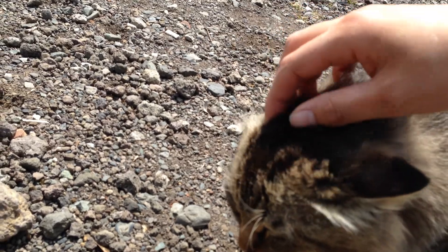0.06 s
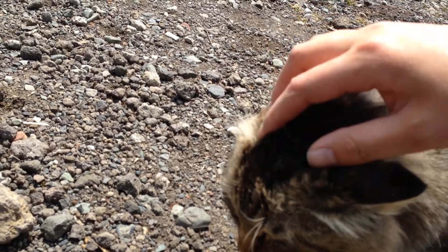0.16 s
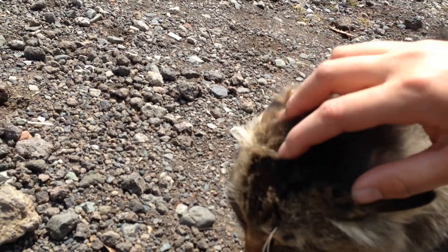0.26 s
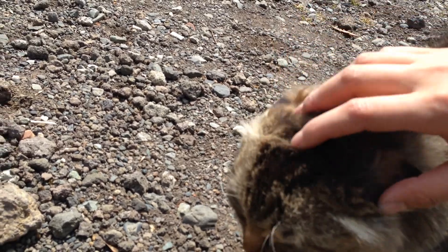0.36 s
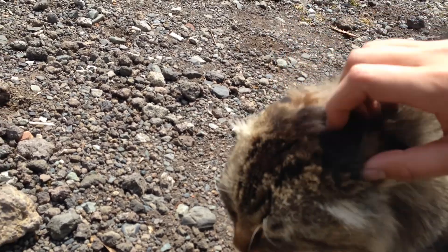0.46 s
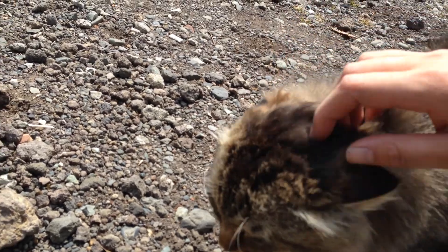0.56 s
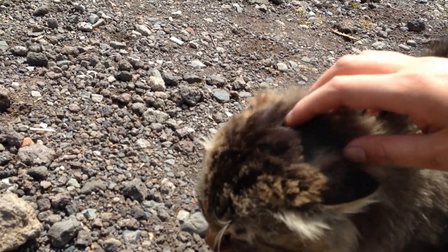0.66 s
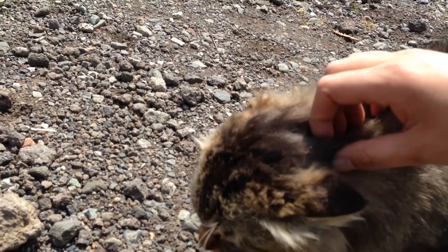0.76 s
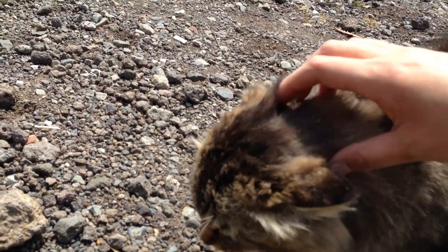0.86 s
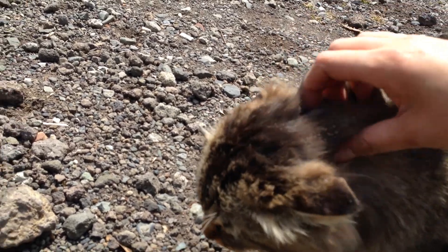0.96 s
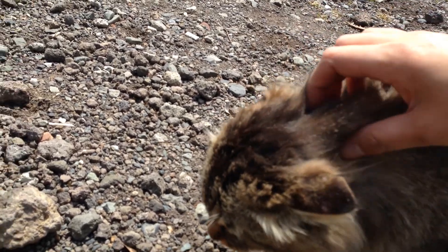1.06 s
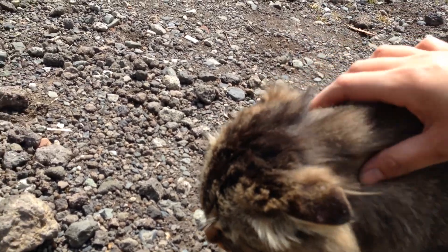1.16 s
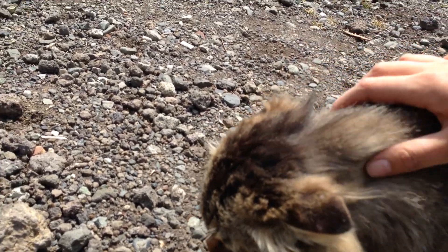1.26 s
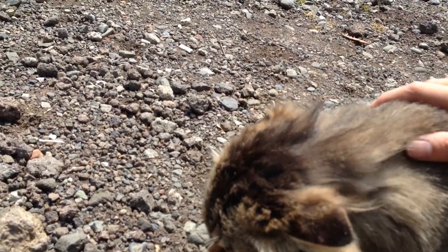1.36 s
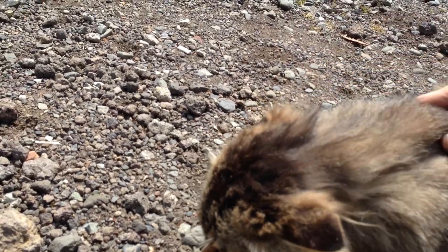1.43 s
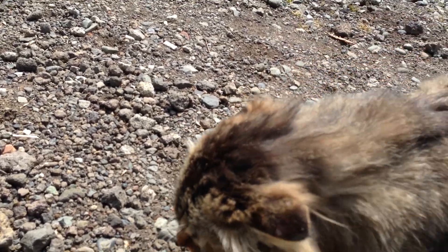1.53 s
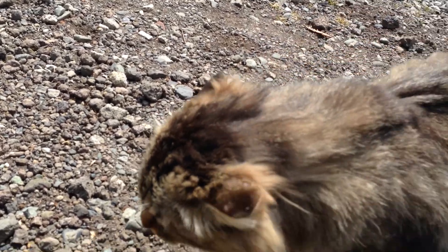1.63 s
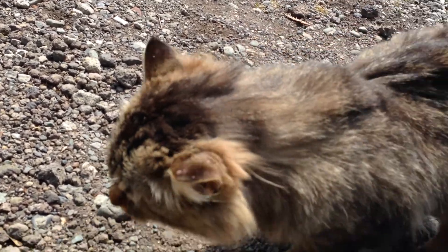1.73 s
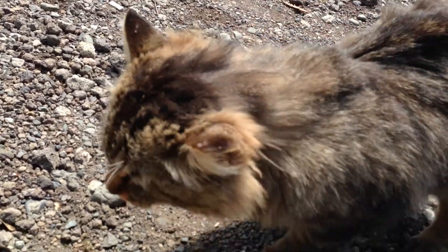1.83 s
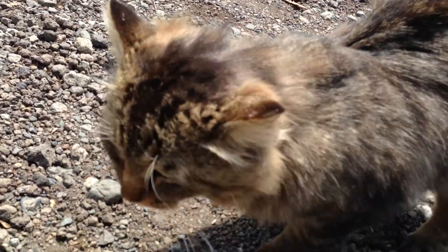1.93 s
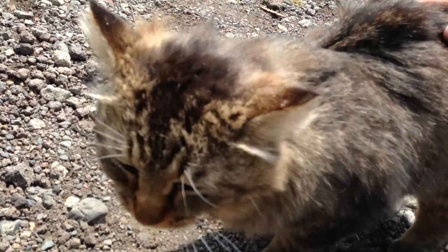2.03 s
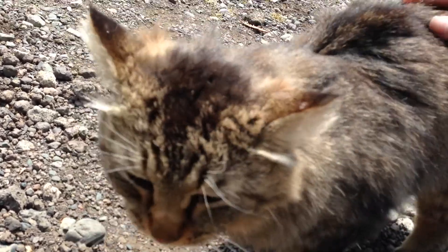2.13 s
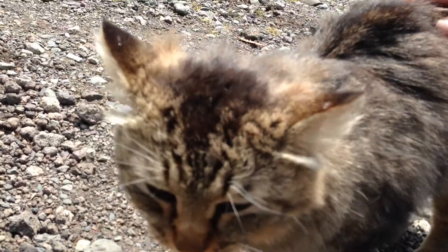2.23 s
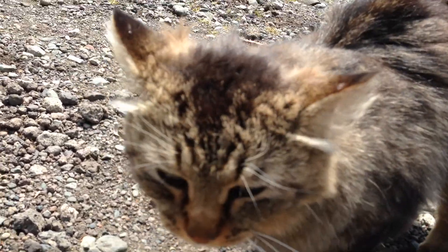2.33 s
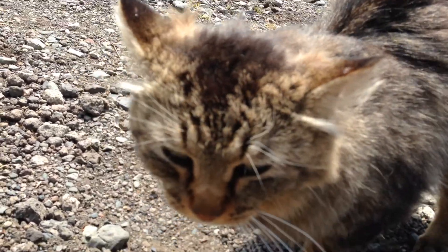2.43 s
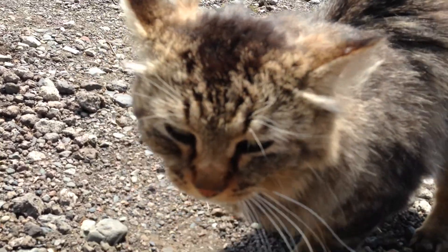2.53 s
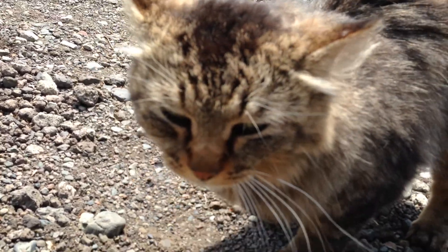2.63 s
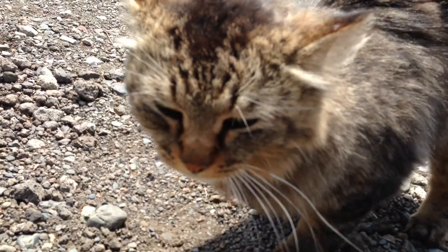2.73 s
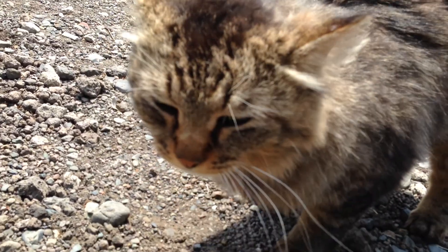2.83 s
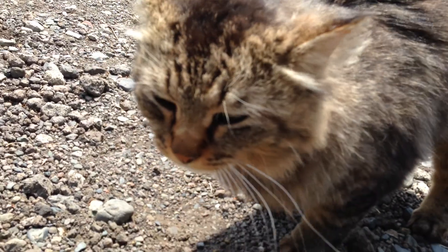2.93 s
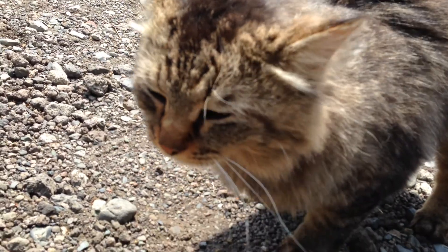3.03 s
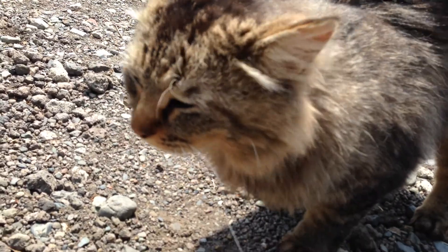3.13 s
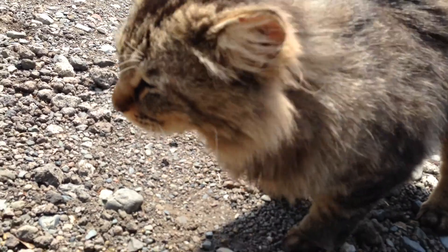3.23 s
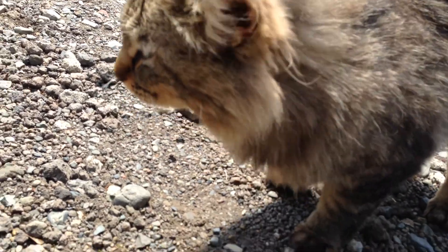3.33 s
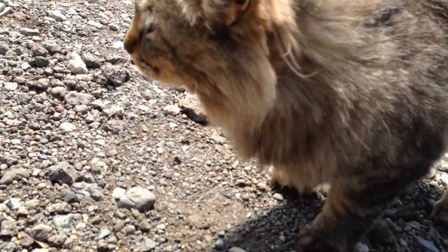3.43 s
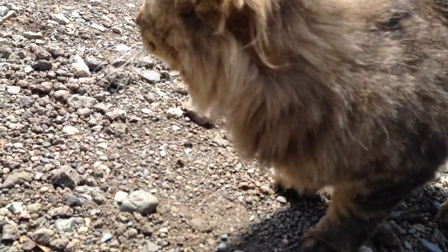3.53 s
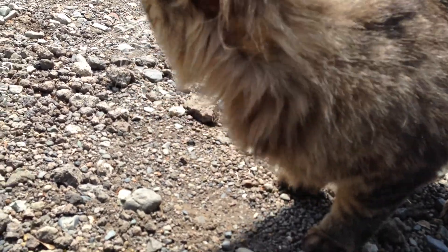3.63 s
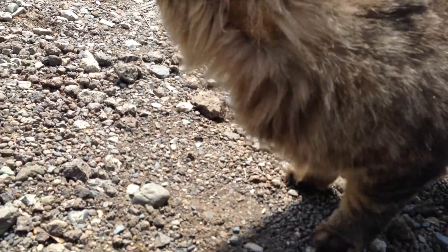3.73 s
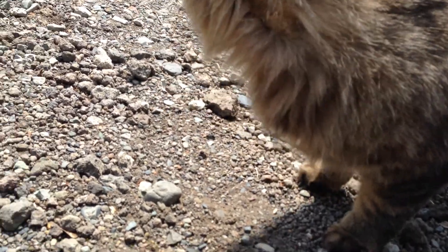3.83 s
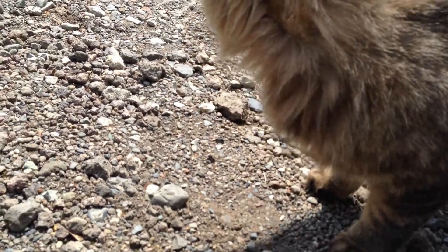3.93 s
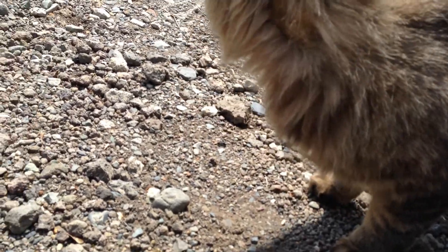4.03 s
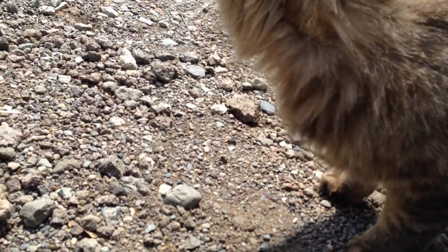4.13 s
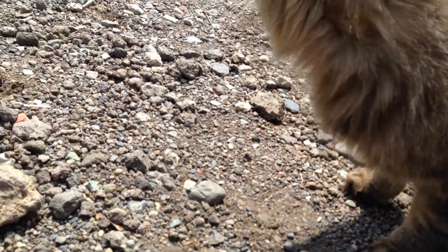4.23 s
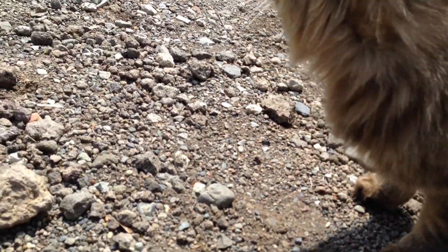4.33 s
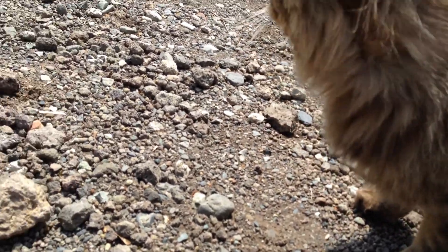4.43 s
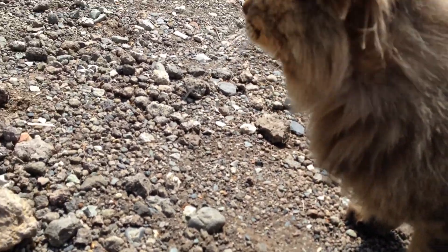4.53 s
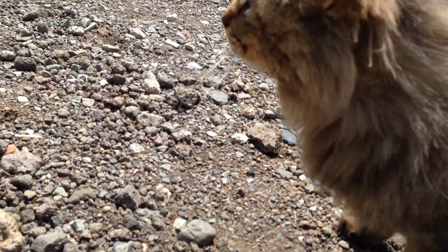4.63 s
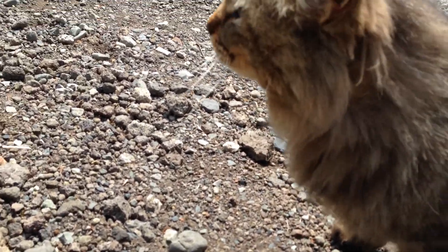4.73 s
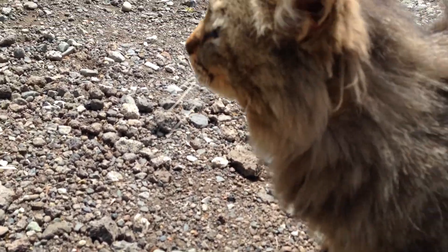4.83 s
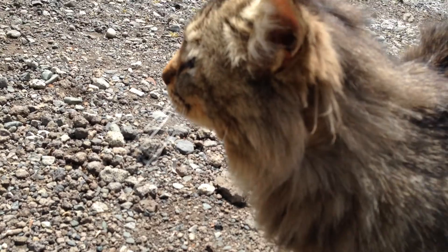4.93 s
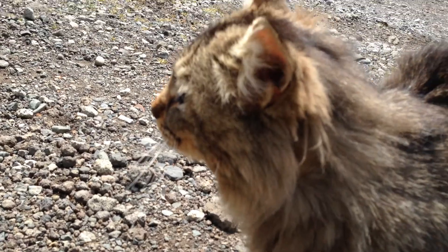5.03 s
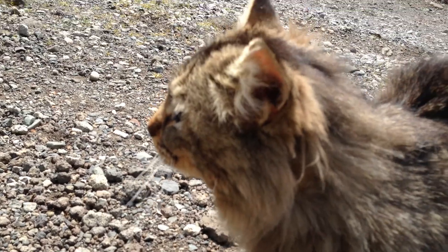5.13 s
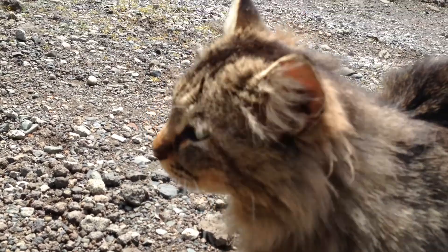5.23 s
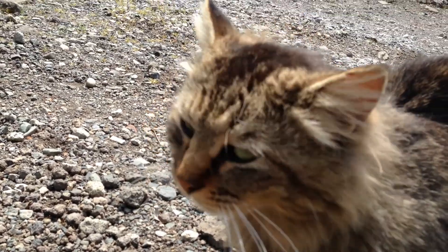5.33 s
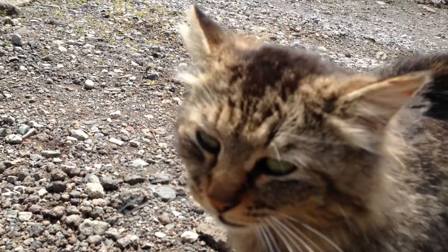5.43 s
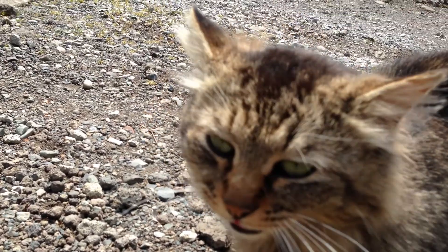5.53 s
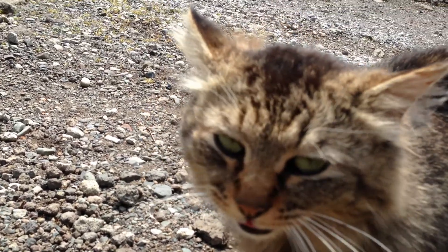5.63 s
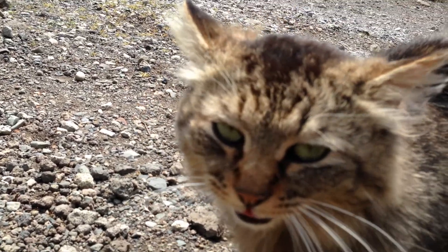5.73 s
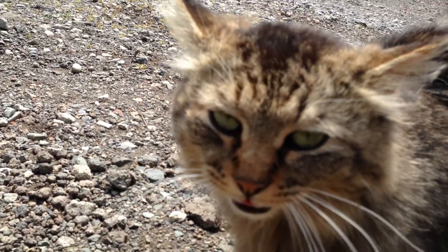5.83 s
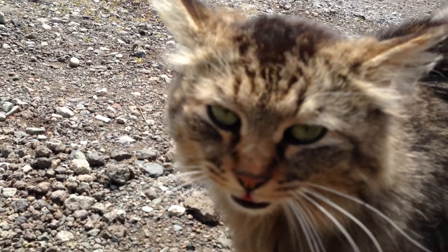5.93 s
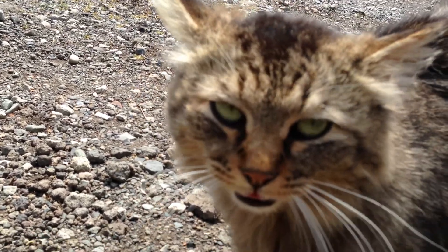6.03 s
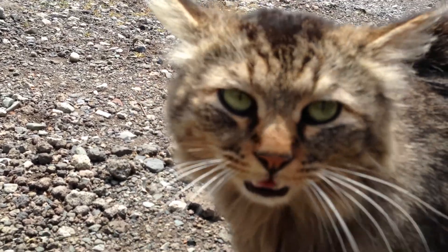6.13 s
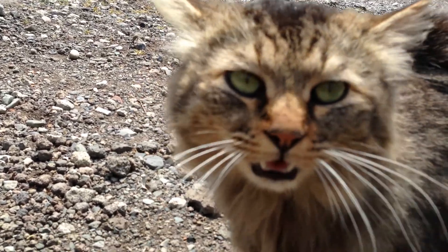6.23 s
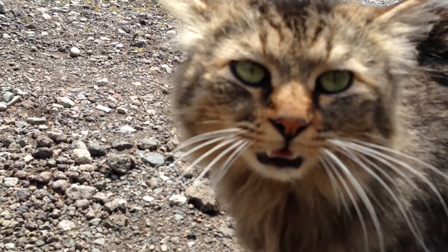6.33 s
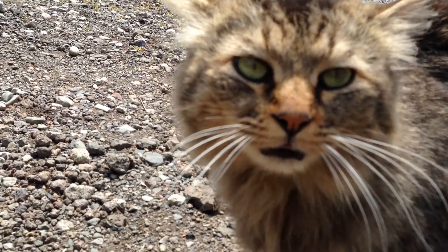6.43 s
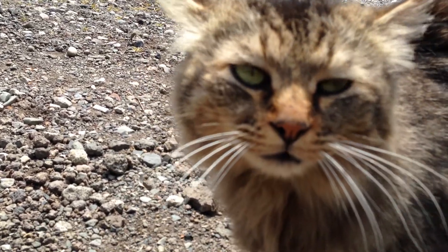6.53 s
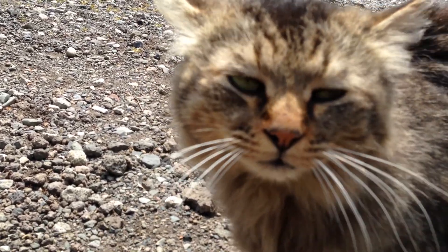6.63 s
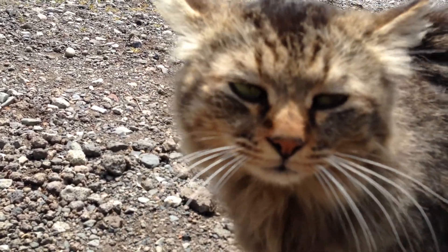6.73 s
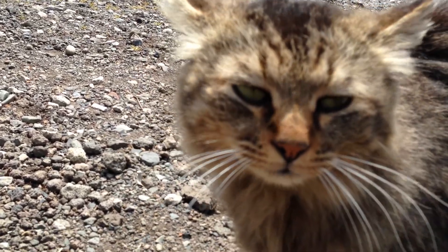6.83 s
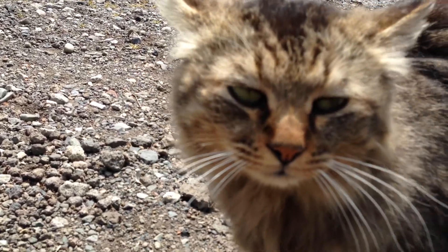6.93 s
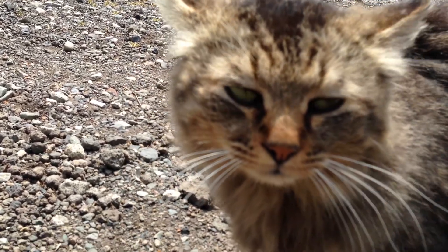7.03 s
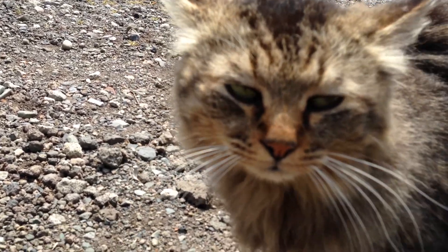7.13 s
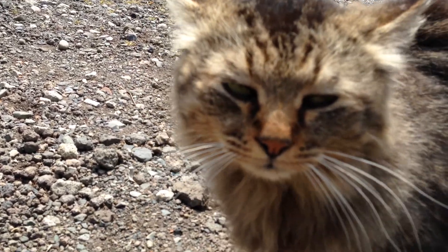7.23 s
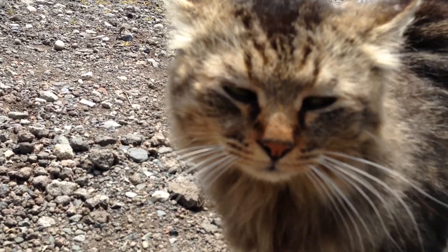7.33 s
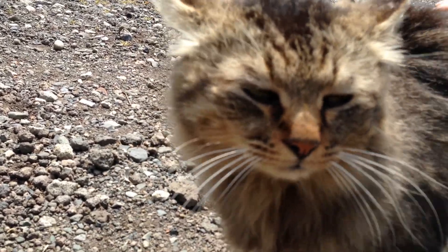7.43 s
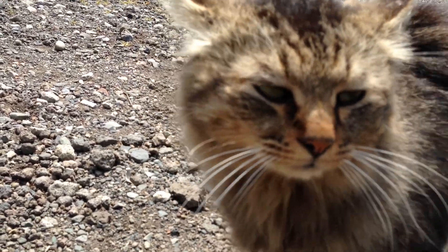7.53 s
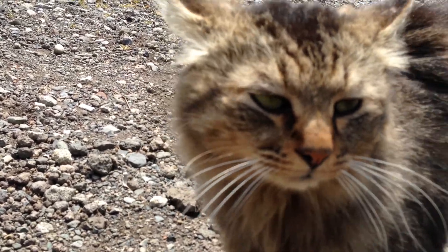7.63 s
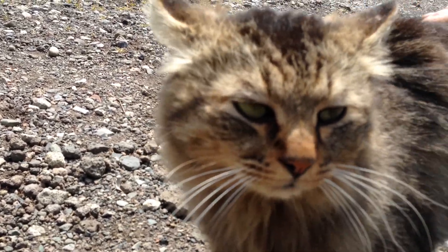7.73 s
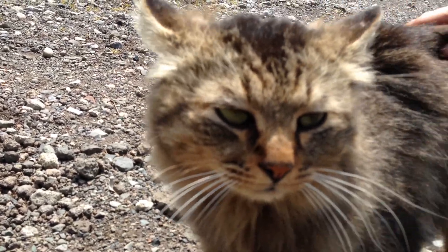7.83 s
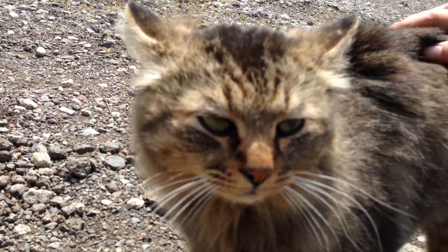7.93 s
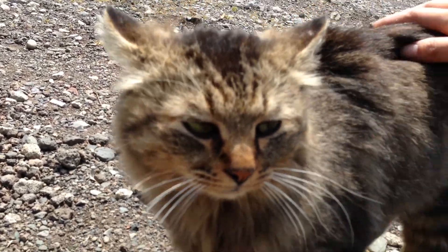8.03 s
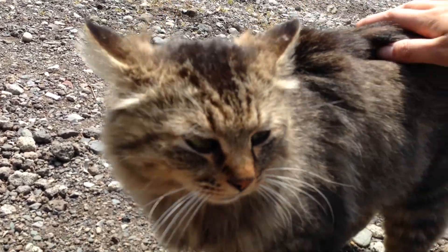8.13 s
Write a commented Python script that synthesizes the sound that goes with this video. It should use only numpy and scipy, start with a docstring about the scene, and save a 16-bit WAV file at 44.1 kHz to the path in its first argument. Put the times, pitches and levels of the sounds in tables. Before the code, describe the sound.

A cat close to the microphone gives a rolled, raspy trill with its mouth shut. After a pause it lets out one long meow that sputters at first, opens into a clear wavering tone and breaks up at the end. A hand then rustles faintly in its fur. Outdoors, light wind bumps the microphone over a soft hiss, and a small bird chirps far away.

```python
"""Light wind bumps the microphone over a steady hiss; a small bird sings far off and a hand rustles in fur.
A cat, stroked up close on open gravel, gives a rolled, raspy trill with its mouth shut: its vocal folds
lock into short tones and flap loosely in between. Then a long meow sputters into a clear, wavering
harmonic tone, coloured by the opening mouth, and breaks up again at the end.
Lips and grit add a few tiny ticks."""
import sys
import numpy as np
from scipy import signal
from scipy.fft import rfft, irfft
from scipy.io import wavfile
from scipy.ndimage import uniform_filter1d

SR = 44100
rng = np.random.default_rng(int(sys.argv[2]) if len(sys.argv) > 2 else 0)


def to_wav(sig):
    """Store sig (one row per channel, or 1-D mono) as 16-bit WAV at the path in sys.argv[1].

    Samples outside -1..1 are clipped; the rate is SR.
    """
    pcm = np.clip(np.atleast_2d(sig), -1, 1) * 32767
    pcm = np.round(pcm).astype(np.int16)
    wavfile.write(sys.argv[1], SR, pcm.T)  # frames by channels


N = 360267
T = np.arange(N) / SR
LIPS_PART_S = 5  # the cat's mouth is shut before this time and open after it
MEOW_START_S, MEOW_END_S = 5.459, 6.337


def amp(db):
    """Decibels to gain."""
    return 10 ** (np.asarray(db) / 20)


def unit(x):
    """Scale to rms 1."""
    return x / np.sqrt(np.mean(x ** 2) + 1e-20)


def curves(table, span):
    """A table's columns as straight-line automation over a span of samples; the first column is time."""
    s, *columns = np.transpose(table)
    return [np.interp(T[span], s, column) for column in columns]


def add(out, s, x):
    """Mix x in at s seconds."""
    i = max(int(s * SR), 0)
    out[i:i + len(x)] += x[:N - i]


def drift(rate):
    """Smooth random modulation of rms 1, heading for a new value rate times a second."""
    hold = max(int(SR / rate), 1)
    steps = np.repeat(rng.standard_normal(N // hold + 1), hold)
    return unit(uniform_filter1d(steps, hold)[:N])


def colour(x, points):
    """Equalise x along a curve of (Hz, dB) points, then scale to rms 1."""
    hz, db = np.transpose(points)
    f = np.maximum(np.fft.rfftfreq(N, 1 / SR), 1)
    gain = amp(np.interp(np.log(f), np.log(hz), db))
    return unit(irfft(rfft(x) * gain, N))


def resonate(x, hz, width):
    """A steep resonance: the same band-pass twice."""
    b, a = signal.iirpeak(hz, hz / width, fs=SR)
    return signal.lfilter(b, a, signal.lfilter(b, a, x))


def bell(f, hz, width):
    """Gain at frequency f of a resonance centred on hz."""
    return 1 / (1 + (2 * (f - hz) / width) ** 2)


def phase_of(hz):
    """Running phase of a moving pitch."""
    return 2 * np.pi * np.cumsum(hz) / SR


def hump(s, half_length):
    """A smooth rise and fall around time s, 1 at its top."""
    return np.exp(-((T - s) / half_length) ** 2)


def swells(table, rest_db):
    """Gain of (time, half length, dB) swells over a resting level."""
    return np.sqrt(amp(rest_db) ** 2 + sum((amp(db) * hump(s, half)) ** 2 for s, half, db in table))


def repeats(first, length, spacing, slowing=1):
    """Each repeat of a run: its time and its place in the run, from -1/2 to 1/2."""
    count = int(round(length / spacing)) + 1
    if count < 2:
        return [(first, 0)]
    return [(first + length * u ** slowing, u - .5) for u in np.linspace(0, 1, count)]


def hiss(level_db=-68):
    """Still air and microphone hiss: an even bed of coloured noise."""
    # Each row: frequency in Hz, EQ gain in dB.
    hiss_eq = [(240, -57), (400, -6.5), (518, -2.5), (670, -10.5), (768, -11.5), (1070, -12), (1540, -12.5),
               (1690, -13.5), (2360, -17.5), (4130, -14), (15000, -22.5)]
    return amp(level_db) * colour(rng.standard_normal(N), hiss_eq)


def wind(rumble_db=-60.5, flutter_db=4.5, turbulence_db=-17.5, small_eddies=60, small_hz=88, cycles=.7):
    """A steady rumble, a gusting breeze, and eddies that push and pull the diaphragm once or twice."""
    # Tone of the rumble, the breeze and the turbulence in an eddy. Each row: frequency in Hz, gain in dB.
    rumble_eq = [(20, -24), (30, -14.5), (40, -3), (48, 7), (65, -5), (130, -8.5), (200, -7.5), (320, -10),
                 (480, -18), (750, -33.5)]
    breeze_eq = [(20, -38), (45, 4), (75, 4), (150, -3.5), (250, -19.5), (450, -17), (900, -44),
                 (3000, -78)]
    turbulence_eq = [(60, -31), (220, 8), (400, -10), (700, -17), (2000, -57), (8000, -90)]
    # Gusts on the microphone. Each row: centre in seconds, half length in seconds, relative level in dB.
    gusts = [(.15, .025, -57), (.52, .06, -57), (1.2, 0.1, -57), (1.77, .025, -60), (3.86, 0.063, -56),
             (4.41, 0.077, -53.5), (4.65, 0.044, -54), (5.1, 0.051, -54.5), (5.88, .12, -53.5),
             (6.135, .025, -41), (6.48, 0.17, -52.5), (6.91, 0.032, -59), (7.7, 0.54, -64)]
    # The strongest eddies. Each row: centre in seconds, frequency in Hz, envelope peak in dB.
    puffs = [(3.276, 140.5, -36.5), (3.307, 104.8, -37), (3.366, 95, -34.5), (3.965, 112, -38),
             (4.414, 85, -36), (4.645, 77.5, -39.5), (4.68, 84, -40.5), (4.798, 127, -37.5),
             (4.929, 123, -40.5), (5.018, 108, -40), (5.916, 114.8, -34), (6.127, 147, -30),
             (6.142, 80.4, -31.5), (6.282, 77, -36.5), (6.324, 144.4, -36), (6.411, 127, -28.5),
             (6.428, 100, -37), (6.506, 152, -31.5), (6.525, 124, -34.5), (6.973, 116, -41.5)]
    out = amp(rumble_db) * colour(rng.standard_normal(N), rumble_eq)
    breeze = swells(gusts, rest_db=-69)
    out += colour(rng.standard_normal(N), breeze_eq) * breeze * amp(flutter_db * drift(25) - 1)
    eddies = [(s, hz, amp(db)) for s, hz, db in puffs]
    # small eddies come at random, 8.5 to 14.5 dB above the gust that carries them
    for when, octave, push in rng.random((small_eddies, 3)):
        gain = breeze[int(when * N)] * amp(8.5 + 6 * push)
        eddies.append((when * N / SR, small_hz * 2 ** (octave - .5), gain))
    t = np.arange(-SR // 20, SR // 20) / SR
    pressure = np.zeros(N)
    for (s, hz, gain), turn in zip(eddies, rng.random(len(eddies))):
        swell = gain / np.cosh(2 * t * hz / cycles)
        add(out, s + t[0], swell * np.cos(2 * np.pi * (hz * t + turn)))
        add(pressure, s + t[0], swell)
    return out + amp(turbulence_db) * pressure * colour(rng.standard_normal(N), turbulence_eq)


def ticks(decay_s=.0013):
    """Tiny contacts of lips and grit, each a damped crack of noise through one resonance."""
    # Each row: start in seconds, centre in Hz, bandwidth in Hz, peak in dB.
    contacts = [(.023, 4570, 4000, -46), (2.448, 1350, 900, -51), (2.549, 5900, 2200, -47),
                (5.367, 5400, 1800, -50.5), (6.476, 3170, 1200, -46.5), (6.915, 1270, 600, -56),
                (6.962, 1690, 1300, -49), (7.048, 950, 890, -45)]
    out, t = np.zeros(N), T[:SR // 20]
    for s, hz, width, db in contacts:
        crack = resonate(rng.standard_normal(len(t)) * np.exp(-t / decay_s), hz, width)
        add(out, s, amp(db) * crack / np.abs(crack).max())
    return out


def bird(chip_s=.019, detune=.013, chip_edge_db=-4, swoop_edge_db=-2.5, echo_db=-1, echo_s=.036):
    """Distant runs of whistled chips and swoops, scattered by the ground and bushes."""
    # Runs of falling chips. Each row: start, length and rough spacing in seconds, slowing exponent,
    # pitch in Hz, relative level in dB, fall within a chip in Hz.
    chip_runs = [(0.211, .449, .056, 1, 4410, -68, 750), (3.877, .275, .068, 1.3, 3840, -64, 1700),
                 (5.503, .219, .055, 1, 4640, -64, 800), (6.161, .137, .137, 1, 4700, -63, 798.5),
                 (7.324, 0.39, .06, 1, 4600, -67.5, 800)]
    # Pitch line of one swoop. Each row: seconds into the note, pitch in Hz.
    swoop_shape = [(0, 3900), (.009, 5300), (.015, 4200), (.026, 3850), (.035, 3200), (.046, 3080),
                   (.068, 3400)]
    # Runs of swoops. Each row: start, length and spacing in seconds, relative level and swell in dB.
    swoop_runs = [(2.249, .738, .123, -60, 6.5), (7.759, .14, .14, -62, 4)]
    out = np.zeros(N)
    u = np.linspace(-.5, .5, int(chip_s * SR))
    for first, length, spacing, slowing, hz, db, fall in chip_runs:
        for s, place in repeats(first, length, spacing, slowing):
            pitch = hz * (1 + detune * rng.standard_normal()) - fall * u
            chip = np.cos(np.pi * u) * np.sin(phase_of(pitch))
            taper_db = chip_edge_db * (2 * place) ** 2  # a run is softer at its ends
            add(out, s - chip_s / 2, amp(db + 2 + taper_db) * chip)
    at, swoop_hz = np.transpose(swoop_shape)
    contour = np.interp(np.arange(int(at[-1] * SR)) / SR, at, swoop_hz)
    tilt = amp(6 * np.log2(contour / contour.mean()))  # a swoop is loudest at its high hook
    swoop = tilt * signal.windows.tukey(len(contour), .15) * np.sin(phase_of(contour))
    for first, length, spacing, db, swell_db in swoop_runs:
        for s, place in repeats(first, length, spacing):
            taper_db = swoop_edge_db * (2 * place) ** 2
            add(out, s, amp(db - 6 + swell_db * place + taper_db) * swoop)
    out *= amp(2 * drift(120))  # many paths make the notes flicker
    tail = rng.standard_normal(SR // 4) * np.exp(-T[:SR // 4] / echo_s)
    return out + amp(echo_db) * signal.fftconvolve(out, tail / np.linalg.norm(tail))[:N]


def fur(grains_per_s=2200, spread_db=2, uneven_db=2):
    """Hairs slip under the fingers in a dense, uneven crackle."""
    # Tone of the rustle. Each row: frequency in Hz, EQ gain in dB.
    fur_eq = [(300, 6), (700, 1), (1800, -1.5), (2800, -6), (5000, -13), (9000, -22), (15000, -17)]
    # Strokes of the hand. Each row: centre in seconds, half length in seconds, level in dB.
    strokes = [(.43, 0.18, -78.5), (1.6, 0.32, -79), (4.5, 1.4, -76.5), (6.45, 0.21, -65.5),
               (7.28, 0.39, -68), (8.15, 0.38, -72.5)]
    grains = (rng.random(N) < grains_per_s / SR) * rng.standard_normal(N)
    grains *= amp(spread_db * np.minimum(rng.exponential(size=N), 4))
    return colour(grains, fur_eq) * swells(strokes, rest_db=-82) * amp(uneven_db * drift(20))


def trill(bursts_per_s=29.5, arch=.13, jitter=.016, shut_hz=1630, open_hz=1870):
    """The folds lock into short tones whose pitch arches with the pressure. Returns sound and gate."""
    # Rolls of the larynx; the shortest are a single burst. Each row: start, roll length and burst length
    # in seconds, pitch and glide within a burst in Hz, then in dB: second harmonic's level,
    # swell over the roll, second formant's relative level, its rise over the roll.
    rolls = [(2.512, 0.00061, .017, 546, -120, -49, 0, -21, 0),
             (2.577, 0.16, 0.016, 475, -15, -45.5, 2, -8, 9), (2.785, 0, 0.0084, 527, 159, -49, 0, -9, 0),
             (2.89, 0.0053, .018, 516, 74, -46.5, 0, -14, -2),
             (2.957, 0.24, .021, 514, 7, -47, 1.8, -11, -3), (5.336, 0, 0.017, 520, -110, -53, 0, -14, 0),
             (5.365, 0.07, .022, 480, -9, -45, 1, -7, 16), (6.35, 0.0052, 0.016, 575, 206, -44, 0, -22, 0)]
    out, voiced = np.zeros(N), np.zeros(N)
    waver = 1 + jitter * drift(400)
    orders = np.arange(1, 9)[:, None]
    for first, roll_s, length, hz, glide, db, swell_db, second_db, rise_db in rolls:
        u = np.linspace(-.5, .5, int((length + .005) * SR))  # 2.5 ms extra at each end for the fades
        gate = signal.windows.tukey(len(u), .45)
        for s, place in repeats(first, roll_s, 1 / bursts_per_s):
            start = s - .0025
            detune, bend, push = np.clip(rng.standard_normal(3), -2, 2)  # no two bursts are alike
            arched_hz = hz * (1 + .039 * detune) * (1 - arch * (2 * u) ** 2)
            pitch = (arched_hz + (glide + 35 * bend) * u) * waver[int(s * SR):][:len(u)]
            harmonics = np.sin(orders * phase_of(pitch))
            # the third and fourth harmonics slide through the second formant
            formant = bell(orders[2:] * pitch, shut_hz if s < LIPS_PART_S else open_hz, width=650) ** 2
            formant /= np.sqrt(np.mean(np.sum(formant ** 2, axis=0)))
            upper_gains = amp(second_db + rise_db * place) * formant + amp(-39)
            tone = amp(-7) * harmonics[0] + harmonics[1] + np.sum(upper_gains * harmonics[2:], axis=0)
            add(out, start, np.sqrt(2) * amp(db + swell_db * place + .9 * push) * gate * tone)
            add(voiced, start, gate)
    return out, np.minimum(voiced, 1)


def flapping(attack_s=.0065, release_s=.012):
    """Envelope of the folds' loose flapping: bouts of rasp, and a trace wherever the meow catches."""
    # Each row: start and end in seconds, relative level in dB, swell over the bout in dB.
    bouts = [(2.513, 2.563, -61, -3), (2.587, 2.793, -49, 1.5), (2.795, 2.808, -54, -4),
             (2.849, 2.857, -53.5, 1), (2.881, 3.244, -50, 2), (3.25, 3.288, -59.5, -5),
             (5.384, 5.458, -47.5, 5), (6.34, 6.363, -43.5, 1.5)]
    in_meow = (T > MEOW_START_S) & (T < MEOW_END_S)
    gain = amp(-68) * roughness() ** 1.7 * in_meow
    for start, end, db, swell_db in bouts:
        edges = np.exp(np.minimum(T - start, 0) / attack_s - np.maximum(T - end, 0) / release_s)
        place = np.interp(T, [start, end], [-.5, .5])
        gain = np.maximum(gain, edges * amp(db + swell_db * place))
    return gain


def rasp(voiced, slaps_per_s=420, shut_db=2, duck_db=-14):
    """The folds slap unevenly and ring the throat, ducking while they are locked in a burst of tone."""
    # Throat resonances, mouth shut and lips parted. Each row: centre in Hz, width in Hz, gain in dB.
    shut_throat = [(354, 186, -2), (1040, 360, -0.5), (1398, 140, 1), (1582, 193, 4), (3130, 150, -28),
                   (3690, 400, -18.5)]
    open_throat = [(444, 380, -4.5), (1014, 310, 3), (1370, 170, -2.5), (1860, 300, -4), (3170, 450, -20),
                   (3840, 450, -18)]
    timing, force = rng.standard_normal((4000, 2)).T
    gaps_s = np.exp(.3 * timing) / slaps_per_s
    at = (np.cumsum(gaps_s) * SR).astype(int)
    slaps = np.bincount(at, amp(1.5 * force), N)[:N]
    source = unit(slaps - slaps.mean()) + .2 * rng.standard_normal(N)
    shut, parted = (unit(sum(amp(db) * resonate(source, hz, width) for hz, width, db in throat))
                    for throat in (shut_throat, open_throat))
    # through the nose, the closed mouth is a side branch that swallows the band above the second formant
    shut = colour(shut, [(1850, 0), (2300, -14), (2900, 0)])
    envelope = flapping() * amp(duck_db * voiced)
    return envelope * np.where(T < LIPS_PART_S, amp(shut_db) * shut, parted)


def roughness(calm=.205):
    """Unsteadiness of the folds through the held meow, from 0 to 1."""
    # Catches in the voice. Each row: centre in seconds, half length in seconds, added roughness.
    catches = [(5.465, .04, .38), (5.582, .045, .58), (5.745, .014, .4), (5.95, .016, .3), (6.23, .05, .33),
               (6.335, .02, .5)]
    return calm + sum(extra * hump(s, half) for s, half, extra in catches)


def meow(fundamental_db=-52, shimmer_db=.68, quaver_at_s=6.252, quaver_hz=27.3):
    """A held harmonic tone; the second formant rings as the mouth opens and fades as it closes."""
    # One arch and a low tail. Each row: time in seconds, pitch in Hz.
    melody = [(5.465, 465), (5.549, 472.6), (5.563, 492), (5.593, 476), (5.639, 510), (5.75, 500.7),
              (5.808, 521.5), (5.915, 491.6), (5.97, 459), (6.017, 442.5), (6.145, 462), (6.24, 437),
              (6.29, 455), (6.335, 437.5)]
    # Formant balance. Each row: time in seconds, first formant (harmonic 2) in dB, then in dB relative
    # to it: nasal resonance (harmonic 3), second formant (harmonic 4), upper formants (5 to 14).
    balance = [(5.465, -42, -7.5, 4.5, -19.5), (5.587, -43.5, -12, 5, -6), (5.639, -43.5, -28, 1, -10.5),
               (5.723, -43, -27, -9.5, -10.5), (5.749, -44.5, -14, 2, -13), (5.793, -42, -19, -16, -9),
               (5.875, -41.5, -13, -8, -15), (5.941, -42.5, -12.5, -21, -11), (5.993, -46.5, -5, -8, -9),
               (6.261, -46, -7.5, -9.5, -15), (6.335, -44.5, -9, -16, -10.5)]
    # The upper formants follow the jaw. Each row: time in seconds, third and fourth formant in Hz.
    jaw = [(5.47, 2630, 3200), (5.56, 2260, 3220), (5.7, 3070, 3760), (5.9, 2820, 3740), (5.97, 3130, 3867),
           (6.04, 2900, 4050), (6.14, 3140, 3630), (6.32, 3263, 3710)]
    span = slice(int(MEOW_START_S * SR), int(MEOW_END_S * SR))
    hz, = curves(melody, span)
    db, nasal_db, second_db, upper_db = curves(balance, span)
    third_hz, fourth_hz = curves(jaw, span)
    rough = roughness()[span]
    # as the meow tires, the roll creeps back as a quaver in its pitch
    quaver = .02 * hump(quaver_at_s, .08) * np.cos(2 * np.pi * quaver_hz * (T - quaver_at_s))
    wander = .006 * rough * drift(60)[span]
    hz = hz * (1 + quaver[span] + wander)
    # cycle-to-cycle jitter smears the high harmonics most
    jitter = .0033 * drift(90)[span] + .023 * rough * drift(480)[span]
    phase = phase_of(hz * (1 + jitter))
    flutter = 1 + .16 * rough * drift(480)[span]
    upper_hz = np.arange(5, 15)[:, None] * hz
    upper = bell(upper_hz, third_hz, width=540) + amp(-1) * bell(upper_hz, fourth_hz, width=480)
    upper += amp(-31)  # a little leaks past both formants
    upper *= amp(upper_db) / np.sqrt(np.sum(upper ** 2, axis=0))
    # the fundamental keeps its own level while the formants move
    gains = [amp(fundamental_db - db), 1, amp(nasal_db), amp(second_db), *upper]
    tone = 0
    for order, gain in enumerate(gains, 1):
        shimmer = amp(shimmer_db * np.sqrt(order) * drift(70)[span])
        tone += gain * shimmer * np.sin(order * phase)
    out = np.zeros(N)
    out[span] = np.sqrt(2) * amp(db) * flutter * tone * signal.windows.tukey(len(tone), .01)
    return out


def scene():
    """A mono mix: the cat in front, everything else faint around it."""
    rolled, voiced = trill()
    air = hiss()
    cat = rolled + rasp(voiced) + meow()
    return (cat + bird() + wind() + ticks() + fur() + air)[None]


def record(dry):
    """A steep low-pass cuts the treble above 15.4 kHz."""
    return signal.sosfilt(signal.ellip(12, .1, 70, 15400, fs=SR, output="sos"), dry)


dry = scene()
out = record(dry)
to_wav(out)
```